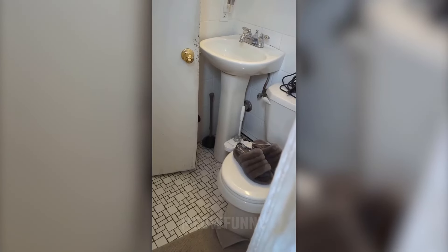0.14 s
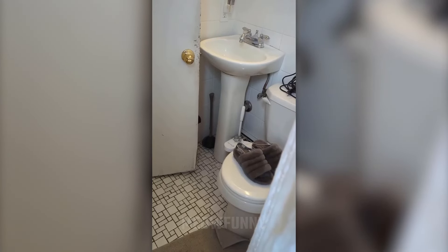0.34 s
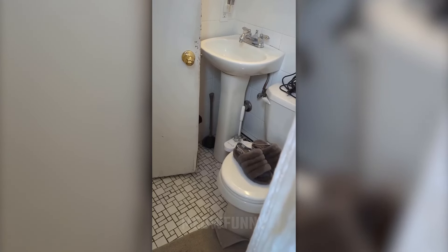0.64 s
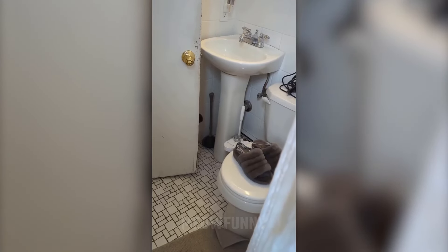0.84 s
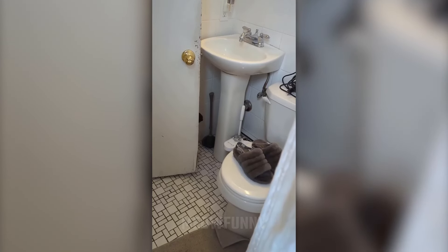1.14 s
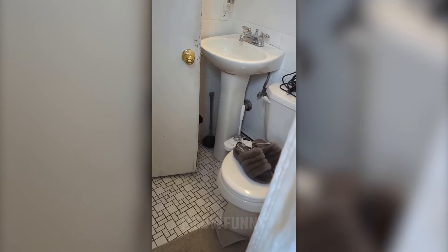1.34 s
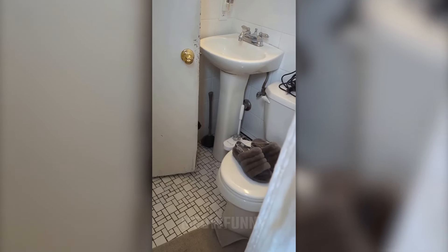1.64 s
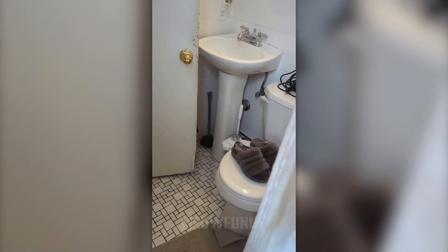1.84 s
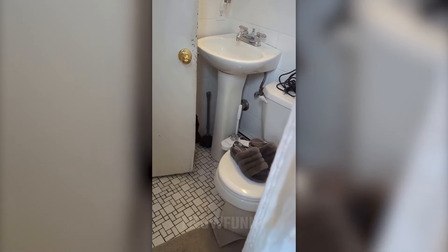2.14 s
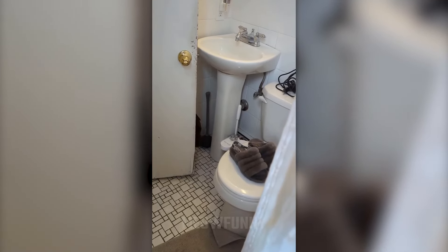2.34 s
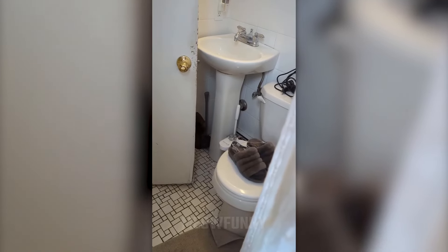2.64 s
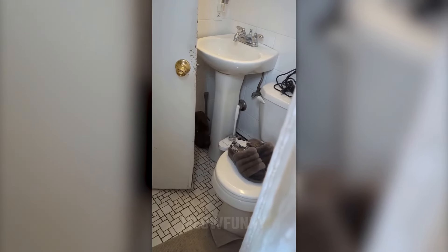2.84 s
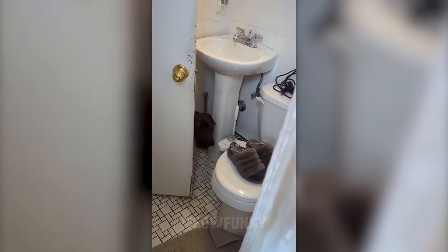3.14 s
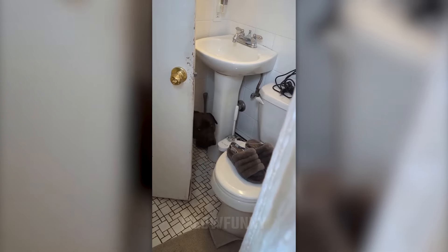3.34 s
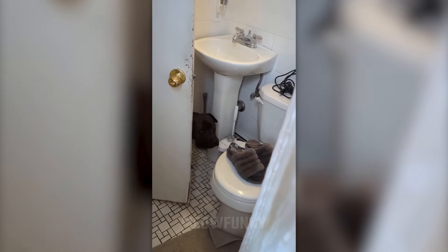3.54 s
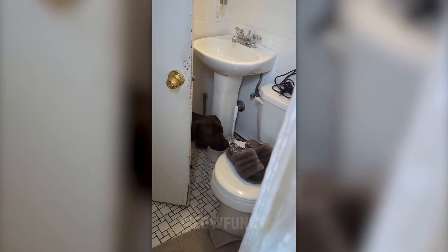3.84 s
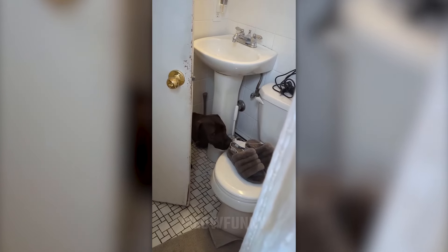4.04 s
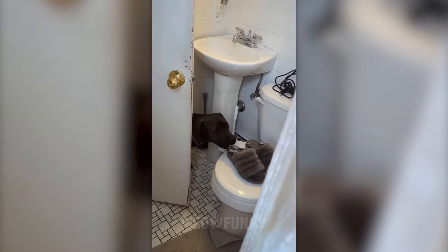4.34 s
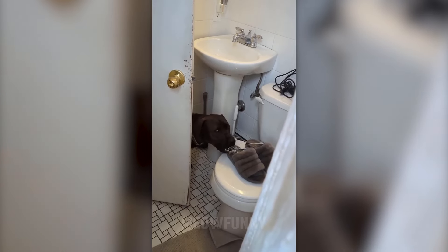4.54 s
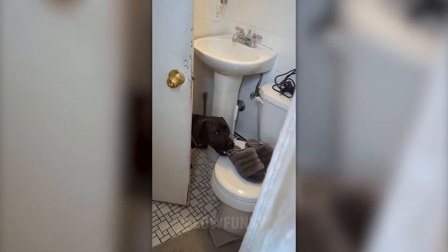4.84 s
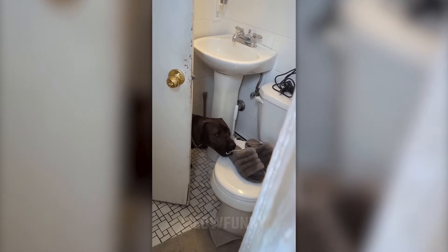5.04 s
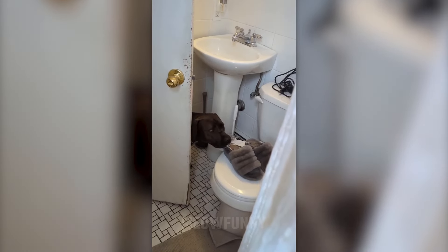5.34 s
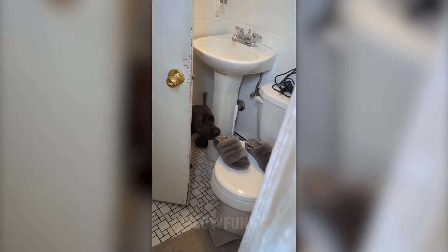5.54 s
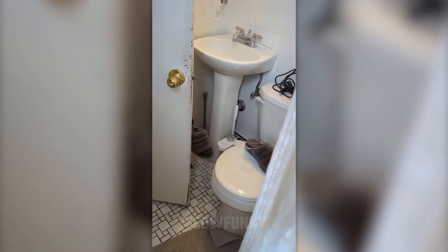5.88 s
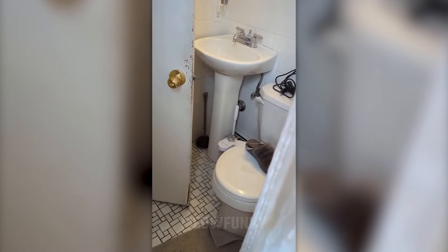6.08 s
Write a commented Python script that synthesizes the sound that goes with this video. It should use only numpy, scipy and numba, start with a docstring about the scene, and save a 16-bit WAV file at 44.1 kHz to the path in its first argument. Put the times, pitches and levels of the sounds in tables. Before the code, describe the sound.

Bright, dense shower spray and ringing tub patter swell very slightly over a steady mains-pitched fan hum and soft duct rumble.

```python
"""A small tiled bathroom with a shower running, heard on a hand-held phone a step from the tub.
Fine jets hiss: showers of random clicks, tinted by pitch. Drops patter through the ringing tub and panels,
bubbles are fading sines that glide up, and random echoes from the tiles blur this water.
A ceiling fan hums in sines at multiples of the mains, over a rumble of tinted noise.
A few stray drops tick, mostly near the right microphone port, as very short sines."""
import sys
import numpy as np
from scipy import signal
from scipy.fft import rfft, irfft, next_fast_len
from scipy.io import wavfile
from scipy.ndimage import map_coordinates
from numba import njit

SR = 44100
rng = np.random.default_rng(int(sys.argv[2]) if len(sys.argv) > 2 else 0)


def persist_wave(psi):
    """Save psi, clipped to +-1, as 16-bit WAV."""
    counts = np.round(np.clip(psi, -1, 1) * 32767).astype(np.int16)
    wavfile.write(sys.argv[1], SR, np.atleast_2d(counts).T)


N = 273905
T = np.arange(N) / SR  # time in seconds
SIZE = next_fast_len(N)
HZ = np.maximum(np.arange(SIZE // 2 + 1) * SR / SIZE, 1)  # pitches of the spectrum
SIDES = np.array([[1], [-1]])  # left port, right port


def shower():
    """Jets of water hiss through the air and land in the tub; both swell and surge with the flow."""
    # How the water's level swells, then drifts. Each row: time in seconds, level of the jets in dB.
    swell = [(0.0, -35), (0.7, -34), (1.3, -33.5), (1.8, -32.5), (2.7, -32), (3.9, -31.5), (4.3, -31.5),
             (4.6, -32), (5.2, -30.5), (5.7, -31.5), (6.21, -31)]
    # The hiss spurts or dips briefly. Each row: middle in seconds, change in dB, half length in seconds.
    spurts = [(.185, 1.5, .015), (.74, 3, .02), (1.03, 1.5, .014), (1.658, -5, .014), (1.697, 1, 0.017),
              (2.67, 2, 0.016), (4.216, 1.5, 0.018), (5.28, 1.5, .02)]
    water_db, water_pan_db = -4, -.9  # tub water against the jets; left minus right
    level_db, = curves(swell)
    spurt_db = sum(db * np.exp(-((T - s) / half) ** 4) for s, db, half in spurts)
    surge = walk(16)  # the flow surges a little
    hiss = undb(spurt_db) * jets(surge)
    water = undb(water_db + water_pan_db / 2 * SIDES) * tub_water(surge)
    return undb(level_db) * (hiss + water)


def jets(surge):
    """Crowds of tiny impacts blur into a hiss, which the cavities of the shower head tint."""
    # The tint of the hiss. Each row: pitch in Hz, relative level in dB per Hz.
    spectrum = [(4500, -59), (6000, -24), (6220, -2.5), (6450, -3.5), (8400, 0), (9800, -3.5), (11000, -1),
                (12000, 0.5), (14800, -1.5), (16000, -6.5)]
    # Cavities of the shower head. Each row: pitch in Hz, width in Hz, boost or cut in dB.
    head = [(6600, 220, -4), (6740, 150, 2.5), (7470, 380, -3), (8240, 890, -1), (11900, 150, 2),
            (13400, 130, -0.5)]
    top_from_hz, shade_db = 9800, -5.5  # start of the shortest waves; their left minus right
    swell_db = 0.29 * surge + .5 * walk(40)
    hiss = colour(drops(rate=1000, spread_db=1.5, blur=0.89), spectrum, head, swell_db,
                  flicker_db=2.4, flicker_rate=45, patch_hz=150.0, full_hz=5400, size=1024)
    top = irfft(rfft(hiss, SIZE) / (1 + (top_from_hz / HZ) ** 8), SIZE)[:N]
    # the spray sways from side to side; the phone's body shades the left port from the shortest waves
    sway_db = (1.24 * walk(25) + 0.14) * SIDES
    top_sway_db = (shade_db / 2 + .5 * walk(70)) * SIDES
    return (hiss - top) * undb(sway_db) + top * undb(top_sway_db)


def tub_water(surge):
    """Patter, bubbles and splashes together, blurred by the echo of the tiles."""
    fizz = undb(-11.5) * bubbles(2100., 6800., cycles=58.0, spread_db=3.0, count=5000)
    gurgle = undb(-15.0) * bubbles(400., 1300., cycles=24.5, spread_db=1.9, count=600)
    return tiles(patter(surge) + fizz + gurgle + splashes())


def patter(surge):
    """Drops set the tub ringing alike at both ports, and the wall panels in opposite sense."""
    # The tint of the falling drops. Each row: pitch in Hz, relative level in dB per Hz.
    spectrum = [(250, -3.5), (500, -4.5), (840, -3.5), (1150, -1.5), (2000, -1.5), (3200, -1), (4300, 0),
                (5400, -0.4), (5800, -3.5), (6200, -2.5), (6850, -1), (7000, -11), (8700, -15),
                (10000, -11.5), (16000, -11)]
    # Tub and stall ring under the drops. Each row: pitch in Hz, width in Hz, dB over the patter.
    tub_modes = [(425, 20, 4), (484, 13, 9), (602, 18, 8), (668, 20, 5.5), (753, 30, 4.5), (920, 16, 6.5),
                 (980, 50, 2.5), (1215, 18, 4), (1280, 25, -4.5), (1345, 25, 6.5), (1478, 24, 8),
                 (1508, 18, 3.5), (1540, 28, 7.5), (1591, 18, 6), (2800, 90, 3), (3400, 150, 4)]
    # Wall panels ring too. Each row: pitch in Hz, width in Hz, dB over the patter.
    panel_modes = [(386, 20, 9), (490, 40, 0), (626, 53, -2), (840, 50, -1), (935, 100, 10), (1340, 40, 8),
                   (1500, 67, 7), (1540, 50, 4.5), (1560, 30, 3), (3370, 110, 9), (3600, 110, -1),
                   (6700, 170, -1)]
    panels_db = 0.45  # against the tub
    tub, panels = (colour(drops(rate=1600, spread_db=8.5, blur=0.96), spectrum, modes, 0.59 * surge,
                          flicker_db=3.86, flicker_rate=36, patch_hz=109.8, full_hz=3600, size=1024)
                   for modes in (tub_modes, panel_modes))
    return (tub + undb(panels_db) * SIDES * panels) / np.sqrt(2)


def bubbles(low_hz, high_hz, cycles, spread_db, count):
    """Air caught by drops in the shallow water rings, all around the phone; rms 1."""
    when, pitch, long, size, place = rng.random((count, 5)).T
    start = (when * N).astype(int)
    hz = low_hz * (high_hz / low_hz) ** pitch
    gain = undb(spread_db * np.minimum(-np.log(1 - size), 3.0))
    turn = 2 * np.pi * place
    out = ring(N, start, hz, cycles * (.5 + long), gain * np.cos(turn), gain * np.sin(turn), 0.008)
    return out / out.std()


@njit
def ring(out_size, start, hz, cycles, left, right, glide):
    """Each bubble is a fading sine that glides up."""
    out = np.zeros((2, out_size))
    for g in range(len(start)):
        # z spins and shrinks by p at each sample; bend makes p spin ever faster
        z = 1. + 0j
        p = np.exp((2j * np.pi - 1 / cycles[g]) * hz[g] / SR)
        bend = np.exp(2j * np.pi * glide * (hz[g] / SR) ** 2 / cycles[g])
        end = min(out_size, start[g] + int(5 * cycles[g] * SR / hz[g]))
        for i in range(start[g], end):
            z, p = z * p, p * bend
            out[0, i] += left[g] * z.imag
            out[1, i] += right[g] * z.imag
    return out


def splashes():
    """A sheet of water breaks up: short swells of mid-high spatter, made of tinted noise."""
    # Brief spatters. Each row: middle in seconds, dB over the patter, half length in seconds.
    spatters = [(1.043, -2.5, 0.036), (1.2, -2, 0.03), (2.635, -7, 0.02), (3.79, -7, 0.074),
                (3.944, -13, 0.022)]
    swell = sum(undb(db) * np.exp(-((T - s) / half) ** 2) for s, db, half in spatters)
    spectrum = [(1300, -14), (1900, 8.0), (3200, 3.0), (4300, 1)]  # pitch in Hz, dB per Hz
    spatter = colour(rng.standard_normal((2, N)), spectrum, [], swell_db=0,
                     flicker_db=1.6, flicker_rate=28.1, patch_hz=930, full_hz=1300, size=512)
    return undb(0.5) * swell * spatter


def tiles(x):
    """Short dense echoes, different at each port, ripple the spectrum."""
    t60_s, echo_db = .3, -11  # time to fade by 60 dB; echo against the direct sound
    echo = rng.standard_normal((2, SR // 2)) * np.exp(-np.log(1000) * T[:SR // 2] / t60_s)
    echo = undb(echo_db) * echo / np.linalg.norm(echo, axis=1, keepdims=True)
    echoed = irfft(rfft(x, SIZE) * rfft(echo, SIZE), SIZE)[:, :N]
    return (x + echoed) / np.hypot(1, undb(echo_db))


def tick():
    """Stray drops burst: each a bright crack of a few cycles."""
    # Each row: start in seconds, level in dB at the right port, left minus right in dB, pitch in Hz.
    stray_drops = [(.1852, -19, -5, 13000), (.735, -18.5, -5, 13000), (1.0119, -14, -6, 12900),
                   (1.6714, -6, -24, 13200), (1.6805, -20, -8, 12800), (2.655, -14, -6, 14000),
                   (2.6699, -19, -5, 13300), (4.2338, -18, -5, 13000), (5.2235, -18, -5, 13000),
                   (5.2725, -12.5, -6, 13300)]
    out = np.zeros((2, N))
    age = np.arange(SR // 200) / SR / .00014  # 1 at the loudest moment, 0.14 ms after the start
    for s, db, pan_db, hz in stray_drops:
        crack = age * np.exp(1 - age) * np.sin(2 * np.pi * hz * T[:len(age)])
        port_db = db + pan_db * (1 + SIDES) / 2
        out[:, int(s * SR):][:, :len(age)] += undb(port_db) * crack
    return out


def fan():
    """The ceiling fan: a motor that hums and turbulent air that rumbles in the duct."""
    return hum() + air()


def hum():
    """The motor tugs its housing once a mains cycle: three multiples, and a faint tone beneath."""
    # The second multiple sinks and leans right as the door swings open. Each row: time in seconds,
    # level of the first multiple in dB, level of the second in dB, the second's left minus right in dB.
    motor = [(0.0, -39, -28.5, -.4), (0.22, -37.5, -27.5, -.4), (1.49, -35.5, -27.5, 0),
             (1.9, -34, -27, -.3), (2.21, -37, -25, -.3), (2.36, -32, -26.5, -1), (2.55, -35, -27.5, 1),
             (2.87, -33.5, -29, -0.5), (3.5, -33.5, -30.5, -1.5), (4.36, -32.5, -31, -1.2),
             (6.21, -33.5, -30.5, -1.5)]
    mains_hz = 59.99
    first_pan_db, third_pan_db = -3.4, .8  # left minus right
    third_db = -48.5 + 1 * T  # grows by 1 dB a second
    drone_hz, drone_pan_db = 40.0, -2.3
    drone_db = -51.5 + .55 * T  # grows by 0.55 dB a second
    turn = 2 * np.pi * mains_hz * T + np.pi
    first_db, second_db, second_pan_db = curves(motor)
    multiples = [(first_db, first_pan_db), (second_db, second_pan_db), (third_db, third_pan_db)]
    tones = sum(-np.sqrt(2) * undb(db + pan_db / 2 * SIDES) * np.cos(k * turn)
                for k, (db, pan_db) in enumerate(multiples, start=1))
    drone = np.sin(2 * np.pi * drone_hz * T)
    return tones + np.sqrt(2) * undb(drone_db + drone_pan_db / 2 * SIDES) * drone


def air():
    """Turbulent air is tinted noise that feeds the room's low modes and grows as the door opens."""
    # Air that both ports share. Each row: pitch in Hz, relative level in dB per Hz.
    alike_spectrum = [(20, -14), (32, -3), (40, -12), (52, -0.5), (90, -2.5), (145, -2.5), (180, -3),
                      (210, -6), (320, -9), (400, -16.5), (800, -22)]
    # Air in opposite sense at the two ports. Each row: pitch in Hz, relative level in dB per Hz.
    apart_spectrum = [(20, -12), (40, -2), (62, 0), (85, 0), (150, -9), (205, -18), (235, -12), (270, -6),
                      (340, -8), (400, -15), (800, -20)]
    # The room's low modes. Each row: pitch in Hz, width in Hz, boost in dB.
    room = [(139.7, 10, 6), (206, 30, 4), (241.7, 8.2, 7.5), (275.5, 6.9, 6.5), (302, 12.6, 4),
            (328.4, 14, 4.5), (350, 7.7, 4.5)]
    alike_db, apart_db, rise_db_per_s = -41, -50, 0.2
    alike, apart = (colour(rng.standard_normal(N), spectrum, modes, swell_db=0,
                           flicker_db=2.4, flicker_rate=6, patch_hz=35.5, full_hz=210, size=4096)
                    for spectrum, modes in ((alike_spectrum, room), (apart_spectrum, [])))
    rumble = undb(alike_db - 1.1 * SIDES) * alike + undb(apart_db) * SIDES * apart
    return undb(rise_db_per_s * T) * rumble


def undb(db):
    """Decibels to gain."""
    return 10 ** (np.asarray(db) / 20)


def curves(table):
    """Columns of a table, joined by straight lines in time."""
    s, *columns = np.transpose(table)
    return [np.interp(T, s, c) for c in columns]


def walk(rate):
    """Random levels, rate a second, joined smoothly; spread near 1."""
    points = rng.standard_normal(int(N / SR * rate) + 2)
    k, part = (T * rate).astype(int), T * rate % 1
    return points[k] + (points[k + 1] - points[k]) * np.sin(np.pi / 2 * part) ** 2


def drops(rate, spread_db, blur):
    """Random impacts, rate a second, of uneven but bounded size over a blur of noise; rms near 1."""
    when, size, sign = rng.random((3, N))
    gain = undb(spread_db * np.minimum(-np.log(1 - size), 4.0))
    hits = (when < rate / SR) * gain * np.sign(sign - .5)
    return np.sqrt(1 - blur) * hits / hits.std() + np.sqrt(blur) * rng.standard_normal(N)


def colour(x, spectrum, modes, swell_db, flicker_db, flicker_rate, patch_hz, full_hz, size):
    """Tint, resonances, a swell, and small patches of pitch that flicker, less below full_hz; rms 1."""
    hz, db = np.transpose(spectrum)
    db = np.interp(np.log(HZ), np.log(hz), db, left=-90, right=-90)
    db = db + sum(g / (1 + (2 * (HZ - f) / w) ** 2) for f, w, g in modes)
    tinted = irfft(rfft(x, SIZE) * undb(db), SIZE)[..., :N]
    f, s, frames = signal.stft(tinted, SR, nperseg=size)
    # a smooth random map over pitch and time
    place = np.meshgrid(f / patch_hz, s * flicker_rate, indexing="ij")
    flicker = map_coordinates(rng.standard_normal((300, 600)), place, mode="mirror")
    depth_db = flicker_db * np.minimum(f / full_hz, 1)[:, None]
    out = signal.istft(frames * undb(depth_db * flicker), SR, nperseg=size)[1][..., :N]
    out = out * undb(swell_db)
    return out / out.std()


def scene():
    """Shower, fan and stray drops, added at the two ports."""
    return shower() + fan() + tick()


def record(dry):
    """A narrow steady dip in the upper middle, then the phone cuts the top."""
    dip_hz, dip_width_hz, top_hz = 4125, 95, 15650
    notched = signal.lfilter(*signal.iirnotch(dip_hz, dip_hz / dip_width_hz, SR), dry)
    dipped = 0.22 * dry + 0.85 * notched  # the dry share keeps the dip shallow
    return signal.sosfilt(signal.ellip(14, .2, 80, top_hz, fs=SR, output="sos"), dipped)


dry = scene()
out = record(dry)
persist_wave(out)
```